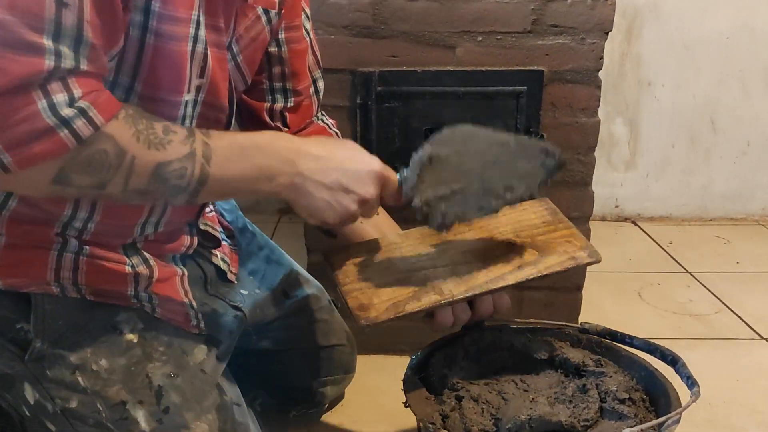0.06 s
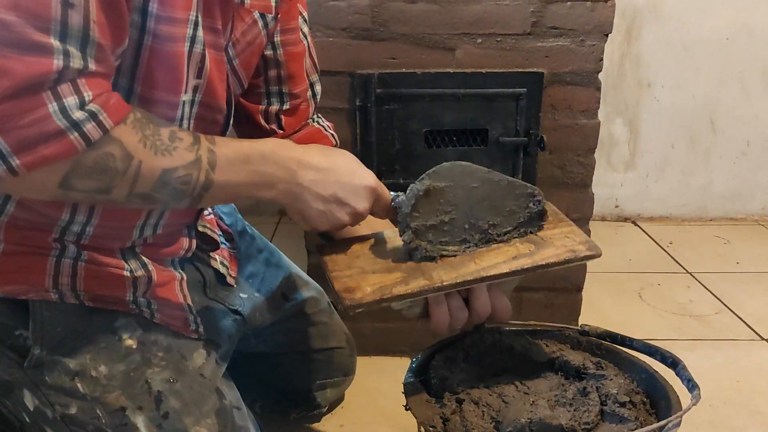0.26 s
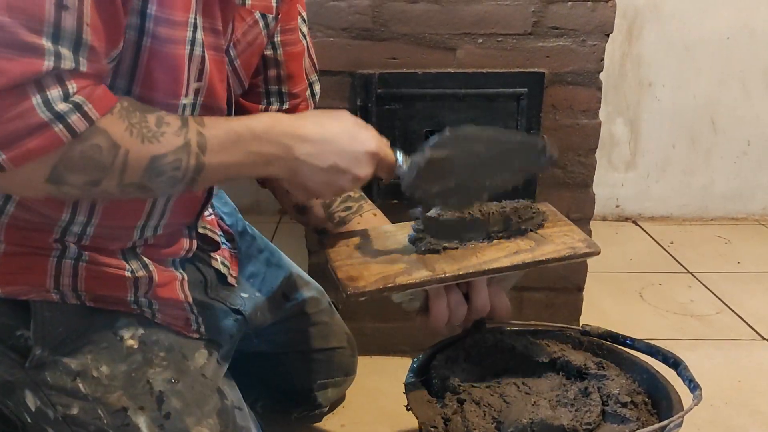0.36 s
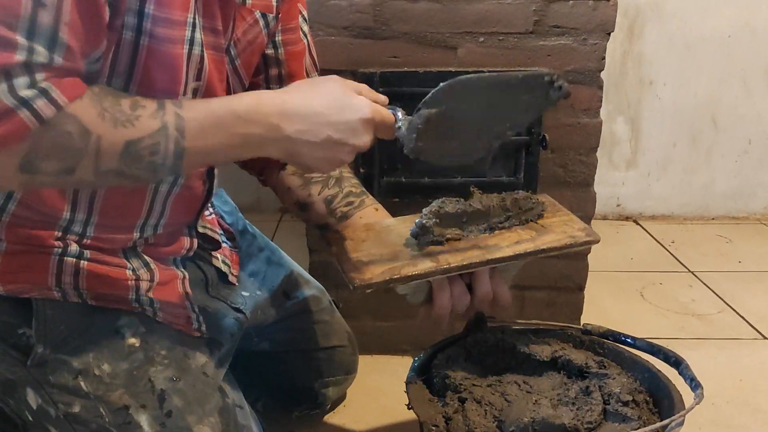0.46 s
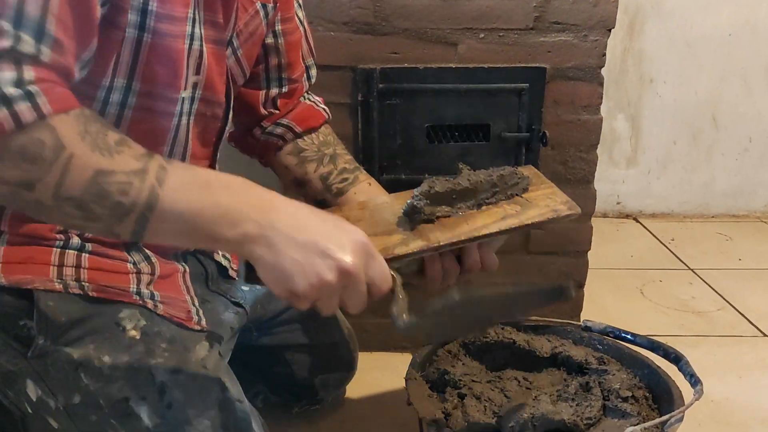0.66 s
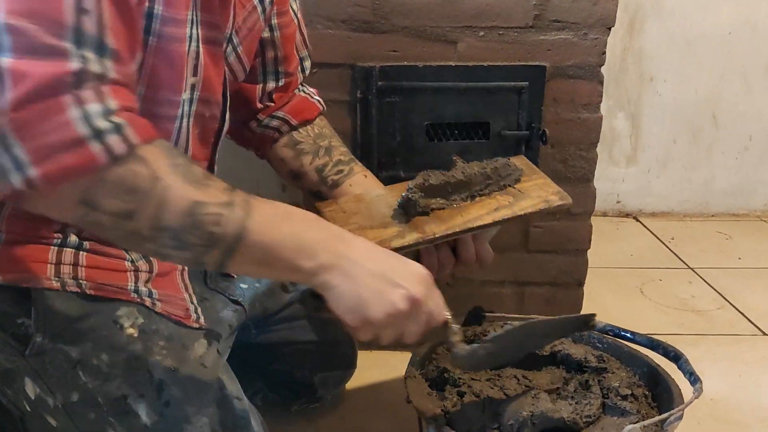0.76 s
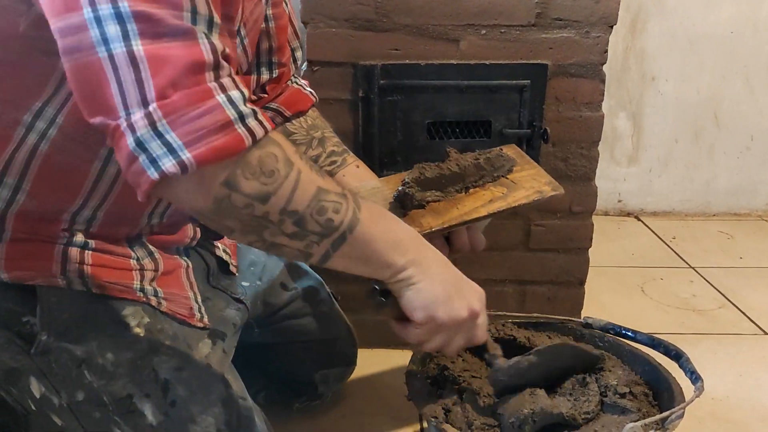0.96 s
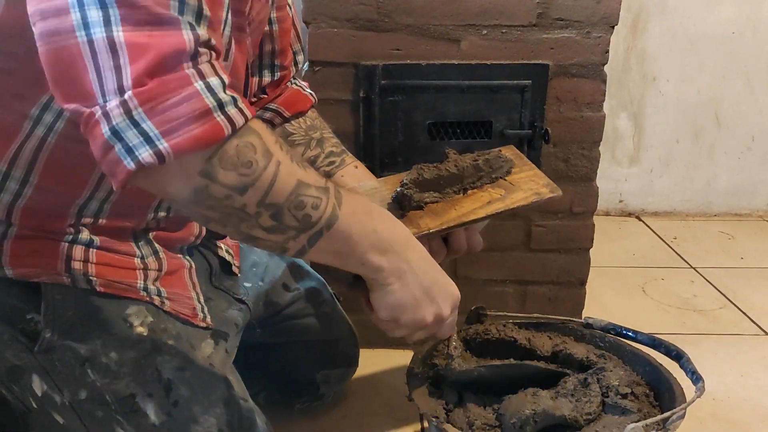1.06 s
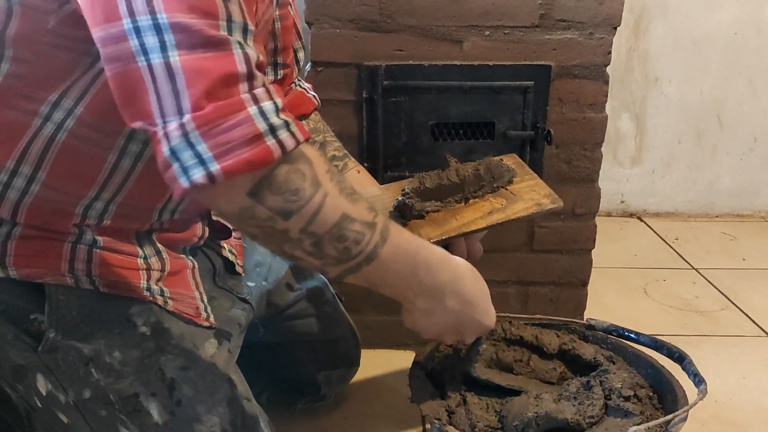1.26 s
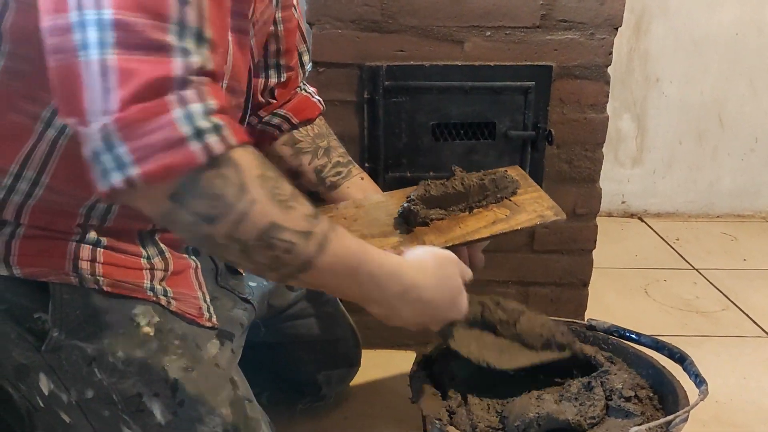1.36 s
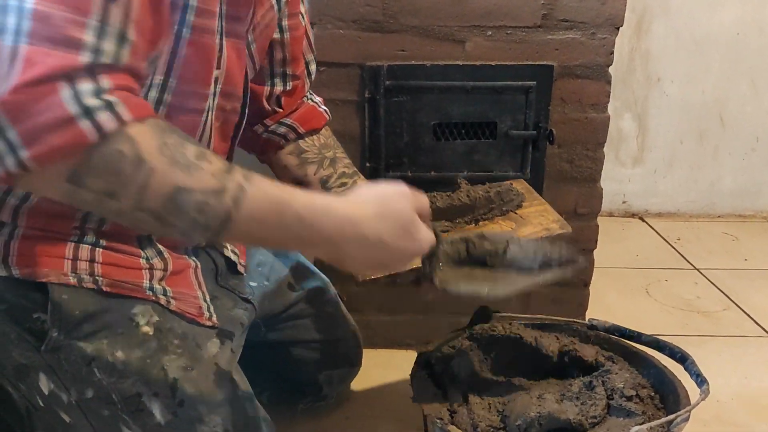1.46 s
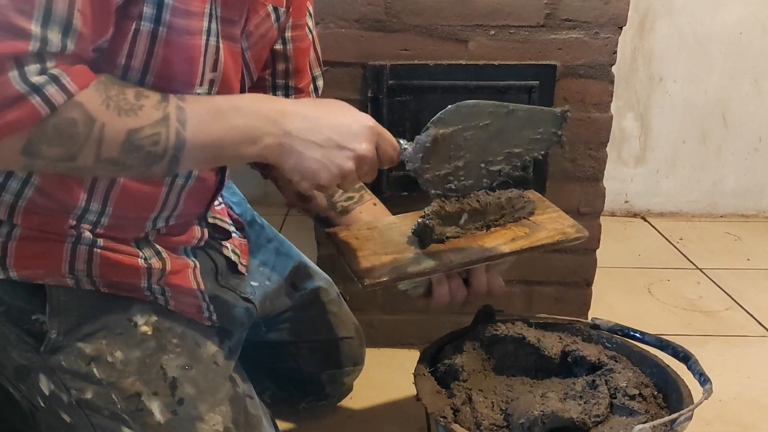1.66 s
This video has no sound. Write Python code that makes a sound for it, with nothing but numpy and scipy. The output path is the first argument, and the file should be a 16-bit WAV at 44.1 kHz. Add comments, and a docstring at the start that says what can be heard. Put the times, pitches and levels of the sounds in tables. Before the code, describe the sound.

Wet plaster slapped and knocked onto a wooden board, then a trowel scoops more from a bucket.

```python
"""Over a low rumble and faint hiss, a sleeve stirs and a steel trowel slaps wet earth plaster onto a
hand-held wooden float, then knocks on it with its edge: wood and blade ring, the plaster splats.
The sleeve rustles as the arm drops to the bucket, and a faint hum comes and goes. The blade cuts into
the gritty mud, which crackles and sucks as a load is lifted; one last rustle follows.
A hard-walled room with a tiled floor rings after every sound."""
import sys
import numpy as np
from scipy import signal
from scipy.fft import rfft, irfft
from scipy.io import wavfile

SR = 44100
rng = np.random.default_rng(int(sys.argv[2]) if len(sys.argv) > 2 else 0)


def persist_wave(psi):
    """Save psi, clipped to +-1, as 16-bit WAV."""
    counts = np.round(np.clip(psi, -1, 1) * 32767).astype(np.int16)
    wavfile.write(sys.argv[1], SR, np.atleast_2d(counts).T)


N = 74970
T = np.arange(N) / SR
HZ = np.maximum(np.fft.rfftfreq(N, 1 / SR), 1)

# ring of float and loaded blade: (frequency [Hz], t60 [s], flat-hit level [dB], edge-hit level [dB])
TOOL_MODES = [(276, 0.036, -35.5, -30), (449.6, 0.024, -44.5, -27.5), (830, 0.014, -22.5, -35),
              (1351, 0.004, -25.5, -21.5), (2117, 0.016, -37, -29), (2250, 0.011, -24.5, -31),
              (2710, 0.016, -12.5, -18), (3280, 0.0058, -22.5, -17.5), (3920, 0.0085, -13, -16),
              (4380, 0.016, -13, -21.5), (5200, 0.0048, -7.5, -15.5), (6400, 0.0063, -21.5, -17.5),
              (6600, 0.0074, -48, -54), (8080, 0.004, -22.5, -51)]
# tone and decay of the room: (frequency [Hz], level [dB], t60 [s], left-right likeness [0-1])
ROOM_BANDS = [(91.5, 7.5, 1, 0.65), (239.8, 4, 1, 0.83), (500, -3, 0.52, 1), (1080, 0, 0.39, 0),
              (2820, 2, 0.38, 0), (4900, -3, 0.34, 0), (8000, -7, 0.34, 0.16), (13600, 0.5, 0.18, 0.14)]


def amp(db):
    """Decibels to gain."""
    return 10 ** (np.asarray(db) / 20)


def unit(x):
    """Scale to rms 1."""
    return x / np.sqrt(np.mean(x ** 2) + 1e-20)


def at_hz(points, hz):
    """Read a two-column table on a log-frequency axis."""
    f, value = np.transpose(points)
    return np.interp(np.log(hz), np.log(f), value)


def colour(x, db):
    """EQ a signal with one gain per frequency bin."""
    return irfft(rfft(x) * amp(db), N)


def pan(db):
    """Left and right gains; positive leans left."""
    return amp(np.array([[db], [-db]]) / 2)


def stereo_noise(likeness):
    """White noise in two channels, alike to a degree that depends on frequency."""
    alike = np.clip(at_hz(likeness, HZ), -.99, .99)
    mid, side = rfft(rng.standard_normal((2, N)))
    return irfft((np.sqrt(1 + alike) * mid + np.sqrt(1 - alike) * side * [[1], [-1]]) / np.sqrt(2), N)


def swell(start, attack, hold, release):
    """Straight rise, hold, exponential fall."""
    rise = np.clip((T - start) / attack, 0, 1)
    return rise * np.exp(-np.maximum(T - start - attack - hold, 0) / release)


def fade(start, decay):
    """Hard attack, exponential fall."""
    return (T >= start) * np.exp(-np.clip((T - start) / decay, 0, 60))


def ring(x, hz, t60):
    """Resonator: a unit click sets a sine of height 1 ringing."""
    r, w = amp(-60 / (t60 * SR)), 2 * np.pi * hz / SR
    return signal.lfilter([1, 0, -1], [1, -2 * r * np.cos(w), r * r], x + 1e-18) / 2


def clicks(rows):
    """One click per (time [s], level [dB]) row."""
    return sum(amp(db) * (np.arange(N) == int(start * SR)) for start, db in rows)


def room_tone():
    """A bed of low rumble and faint hiss, with a hum that comes and goes."""
    # still air of the room: (frequency [Hz], spectral level [dB])
    air_spectrum = [(12, -37), (20, -0.5), (90, -15), (419, -23.5), (567, -24), (725, -27.5), (1040, -28),
                    (1360, -30.5), (1740, -31.5), (1950, -29.5), (2110, -32), (4190, -36), (14000, -45.5)]
    # its stereo image: (frequency [Hz], left-right likeness [0-1])
    air_likeness = [(30, 0), (120, 0.38), (300, 0.095), (800, 0), (8000, 0.066)]
    air = unit(colour(stereo_noise(air_likeness), at_hz(air_spectrum, HZ)))
    hum = swell(start=0.734, attack=0.088, hold=0.34, release=0.043) * np.sin(2 * np.pi * 59.5 * T)
    return amp(-57) * air + amp(-58) * hum


def standing_waves(x):
    """The room's low modes boom on after a blow, a little to the right."""
    # standing waves between the walls: (frequency [Hz], level [dB], t60 [s])
    room_modes = [(82.9, -45.5, 2), (193.2, -64, 0.62), (224.05, -51, 0.73), (254.3, -45, 0.42),
                  (297.6, -48, 0.34), (405.5, -47, 0.32)]
    return pan(db=-4) * sum(amp(db) * ring(x, hz, t60) for hz, db, t60 in room_modes)


def reverb_tail(x):
    """Each third-octave band feeds a diffuse tail that dies sooner in the treble."""
    f, level, t60, likeness = np.transpose(ROOM_BANDS)
    noise, out = rfft(stereo_noise(list(zip(f, likeness)))), 0
    edges = np.geomspace(70, 15000, 25)
    build = np.exp(-1 / (0.0025 * SR))   # the tail blooms in 2.5 ms
    for low, high in zip(edges, edges[1:]):
        hz = np.sqrt(low * high)
        decay = np.exp(-2 * np.log(1000) / (at_hz(list(zip(f, t60)), hz) * SR))
        band = signal.sosfilt(signal.butter(2, [low, high], "band", fs=SR, output="sos"), x + 1e-18)
        poles = [1, -decay - build, decay * build]
        power = signal.lfilter([(1 - decay) * (1 - build)], poles, band ** 2 + 1e-18)
        wash = unit(irfft(noise * (HZ >= low) * (HZ < high), N))
        out = out + amp(at_hz(list(zip(f, level)), hz)) * np.sqrt(np.abs(power)) * wash
    return out


def early_reflections(x):
    """Floor and near walls return a dense, quickly dying cluster of echoes that colours the sound."""
    first_echo_s, build_s, t60_s = 0.00076, 0.00067, 0.24
    f, level, _, likeness = np.transpose(ROOM_BANDS)
    envelope = np.clip((T - first_echo_s) / build_s, 0, 1) * np.exp(-np.log(1000) * T / t60_s)
    echoes = colour(stereo_noise(list(zip(f, likeness))), at_hz(list(zip(f, level)), HZ))
    response = echoes * envelope / np.sqrt(np.sum(envelope ** 2))
    return signal.fftconvolve(x, response, axes=1)[:, :N]


def friction(strokes, spectrum, slips_per_s, spread_db):
    """Each stroke sets off a dense run of tiny slips of uneven size."""
    out = 0
    for start, attack, hold, release, db, tilt in strokes:
        sizes = amp(spread_db * np.minimum(rng.exponential(1, N), 4)) * rng.choice([-1, 1], N)
        slips = sizes * (rng.random(N) < slips_per_s / SR)
        texture = unit(colour(slips, at_hz(spectrum, HZ) + tilt * np.log2(HZ)))
        out = out + amp(db) * swell(start, attack, hold, release) * texture
    return out


def sleeve_rustle():
    """Cloth rubs in soft, fine-grained swishes as the arm moves."""
    # arm moves: (time [s], attack [s], hold [s], release [s], level [dB], tilt [dB/octave])
    moves = [(-.02, 0.03, 0.17, 0.064, -68.5, 6.5), (.55, 0.017, 0.087, 0.044, -65.5, -1.5),
             (.69, 0.02, 0.091, 0.019, -64, 2.5), (1.645, 0.015, 0.031, 0.035, -62.5, 5)]
    # tone of the cloth: (frequency [Hz], spectral level [dB])
    cloth_spectrum = [(200, -4), (900, -1), (2000, 7.5), (4200, 4), (6000, 5.5), (9000, -12.5),
                      (14000, -13.5)]
    return friction(moves, cloth_spectrum, slips_per_s=6700, spread_db=-2.5)


def mud_scrape():
    """Grit scrapes along the blade as it cuts through the mud."""
    # blade strokes: (time [s], attack [s], hold [s], release [s], level [dB], tilt [dB/octave])
    strokes = [(.995, 0.013, 0.049, 0.013, -55.5, -2.5), (1.072, 0.0059, 0.04, 0.092, -48.5, -0.7),
               (1.22, 0.0067, 0.069, 0.05, -50.5, -2.6), (1.355, 0.018, 0.039, 0.038, -47, -2.4)]
    # tone of the grit: (frequency [Hz], spectral level [dB])
    grit_spectrum = [(200, -24.5), (600, -14), (1400, -8), (3300, -1.5), (6000, 4.5), (8000, 4.5),
                     (9500, -10.5), (12000, -9), (14000, -8)]
    return pan(db=1) * friction(strokes, grit_spectrum, slips_per_s=4200, spread_db=2)


def mud_squelches():
    """Air drawn into a pocket of mud sounds its hollow resonance."""
    # pockets opening behind the blade: (time [s], length [s], centre [Hz], width [Hz], level [dB])
    pockets = [(1.09, 0.1, 1280, 910, -59.5), (1.252, 0.065, 1315, 198, -59),
               (1.339, 0.02, 572, 202, -52.5), (1.361, 0.094, 890, 127, -57),
               (1.389, 0.056, 2000, 500, -56), (1.393, 0.041, 2730, 650, -53)]
    out = 0
    for start, length, hz, width, db in pockets:
        hollow = unit(irfft(rfft(rng.standard_normal(N)) / (1 + ((HZ - hz) / (width / 2)) ** 2), N))
        arch = np.sin(np.pi * np.clip((T - start) / length, 0, 1))
        out = out + amp(db) * arch * hollow
    return out


def mud_crackle():
    """Bubbles burst and sand cracks on the steel: each a click into a short ring, dulled by the mud."""
    # single pops: (time [s], level [dB], pitch [Hz], t60 [s], leftward pan [dB])
    pops = [(1.0388, -35.5, 3460, 0.0047, 0), (1.0526, -35.5, 8000, .004, 14.5),
            (1.062, -36.5, 8250, 0.0035, 13), (1.0742, -22, 6400, 0.0011, 14.5),
            (1.2223, -46.5, 1230, .015, -10), (1.2228, -22, 5180, 0.0012, 2),
            (1.3454, -44, 5880, .003, -22), (1.3569, -28, 6160, 0.0023, 7),
            (1.3866, -24, 7500, 0.0023, 14.5), (1.3857, -29, 6600, 0.0054, 11),
            (1.4739, -35.5, 5480, 0.0024, -3)]
    crackle = sum(amp(db) * pan(pan_db) * ring(clicks([(start, 0)]), hz, t60)
                  for start, db, hz, t60, pan_db in pops)
    return signal.sosfilt(signal.butter(1, 9200, fs=SR, output="sos"), crackle)


def blow(contacts, mode_levels, splat_db, splat_s):
    """Contacts ring float and blade and squeeze a burst of noise out of the plaster."""
    # tone of the wet splat: (frequency [Hz], spectral level [dB])
    splat_spectrum = [(50, -32), (160, -2), (520, -1.5), (1400, 1), (3000, -7), (5500, 4), (8000, -7),
                      (9800, -15.5), (14000, -21.5)]
    # its stereo image: (frequency [Hz], left-right likeness [0-1])
    splat_likeness = [(300, 0.99), (1000, 0.16), (4000, 0.1), (10000, 0.14)]
    spray_db, spray_s = -13, 0.017   # plaster goes on spreading: a softer, longer tail on the splat
    low_cut_hz = 134   # the small board radiates little below this
    force = clicks(contacts)
    body = sum((-1) ** k * amp(db) * ring(force, hz, t60)
               for k, ((hz, t60, *_), db) in enumerate(zip(TOOL_MODES, mode_levels)))
    power = sum(amp(db) ** 2 * (fade(start, splat_s) ** 2 + (amp(spray_db) * fade(start, spray_s)) ** 2)
                for start, db in contacts)
    wet_noise = unit(colour(stereo_noise(splat_likeness), at_hz(splat_spectrum, HZ)))
    splat = amp(splat_db) * np.sqrt(power) * wet_noise
    return signal.sosfilt(signal.butter(3, low_cut_hz, "high", fs=SR, output="sos"), body + splat)


def trowel_on_float():
    """A wet slap with the flat of the blade, then a tighter knock with its edge."""
    # the blade lands flat in a quick run of contacts: (time [s], level [dB])
    slap_contacts = [(.2274, -18.5), (.2288, -8), (.2316, 1), (.2329, -0.5), (.2346, -13.5)]
    # the edge strikes the float: (time [s], level [dB])
    knock_contacts = [(.3747, -1), (.3760, -17)]
    _, _, flat_levels, edge_levels = np.transpose(TOOL_MODES)
    slap = blow(slap_contacts, flat_levels, splat_db=-16.5, splat_s=0.0014)
    knock = blow(knock_contacts, edge_levels, splat_db=-19, splat_s=0.00099)
    return slap + knock


def scene():
    """Blows, mud and cloth play up close and through the room, over the room tone."""
    # the blows lean left in the treble: (frequency [Hz], left minus right [dB])
    balance = [(200, -0.5), (700, -5), (1500, 1), (3000, 5.5), (5500, -0.5), (7000, 11), (8500, 15.5),
               (13000, 10)]
    left_lead_s, room_lean_share = 0.000045, 0.34
    lean_db = at_hz(balance, HZ) * np.array([[1], [-1]]) / 2
    blows = trowel_on_float()
    textures = mud_scrape() + mud_squelches() + sleeve_rustle()
    crackle = mud_crackle()
    direct = colour(blows, lean_db) + amp(-1.5) * textures + crackle
    direct[1] = irfft(rfft(direct[1]) * np.exp(-2j * np.pi * HZ * left_lead_s), N)
    send = colour(blows, room_lean_share * lean_db) + amp(-2) * textures + crackle.mean(axis=0)
    room = early_reflections(send) + reverb_tail(send) + standing_waves(blows.mean(axis=0))
    return direct + room + room_tone()


def record(dry):
    """A steep high cut at 14.2 kHz."""
    return signal.sosfilt(signal.ellip(10, .1, 80, 14200, fs=SR, output="sos"), dry)


dry = scene()
out = record(dry)
persist_wave(out)
```